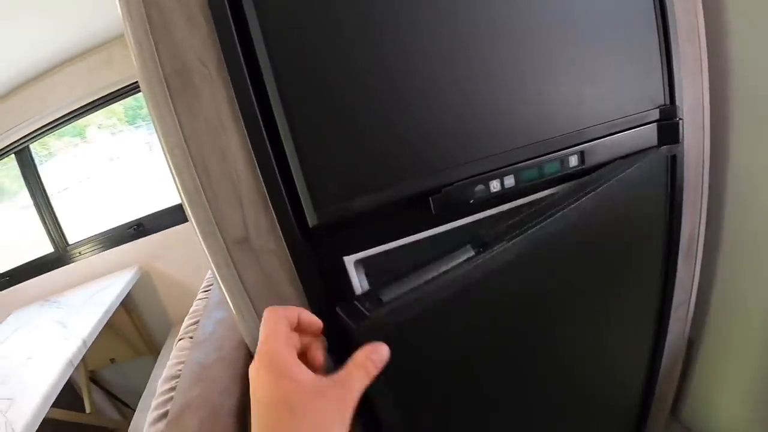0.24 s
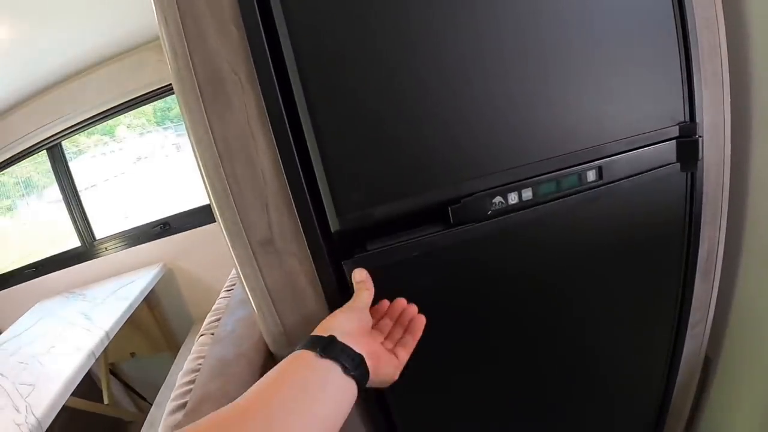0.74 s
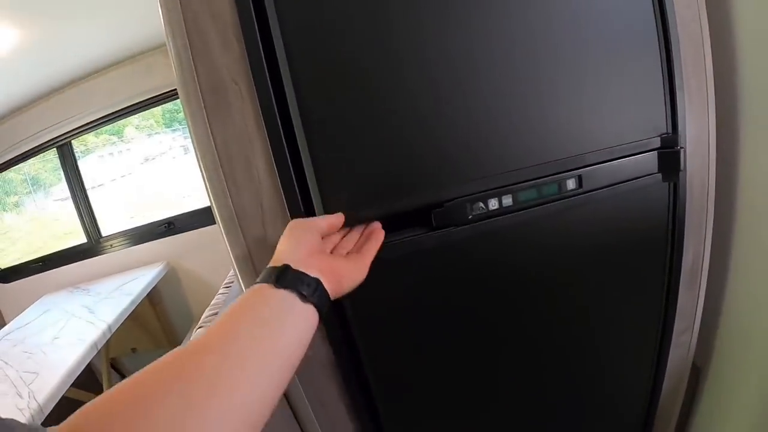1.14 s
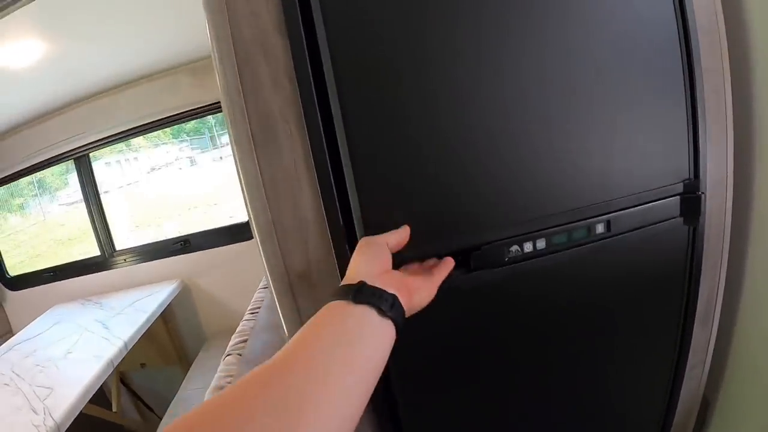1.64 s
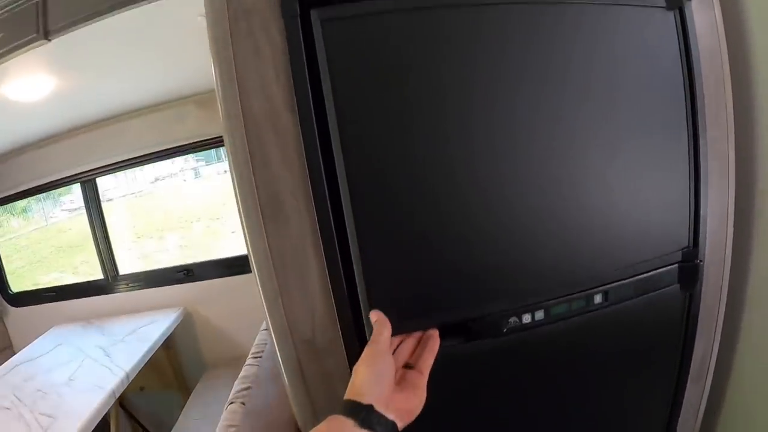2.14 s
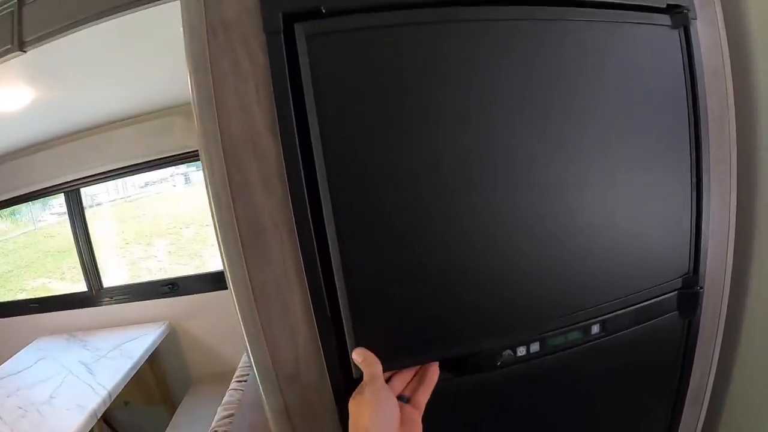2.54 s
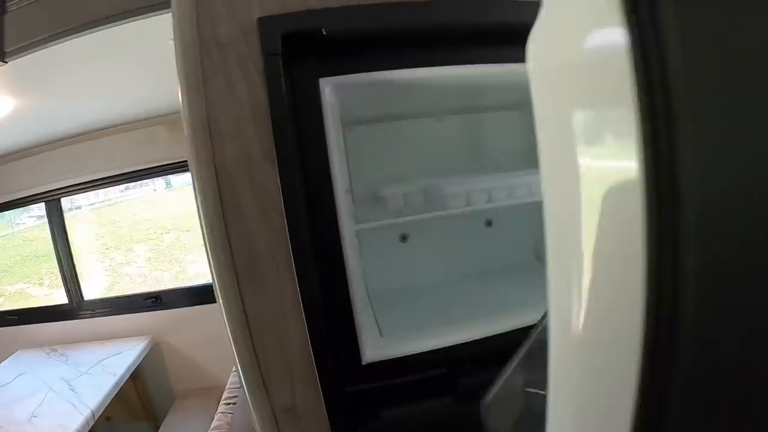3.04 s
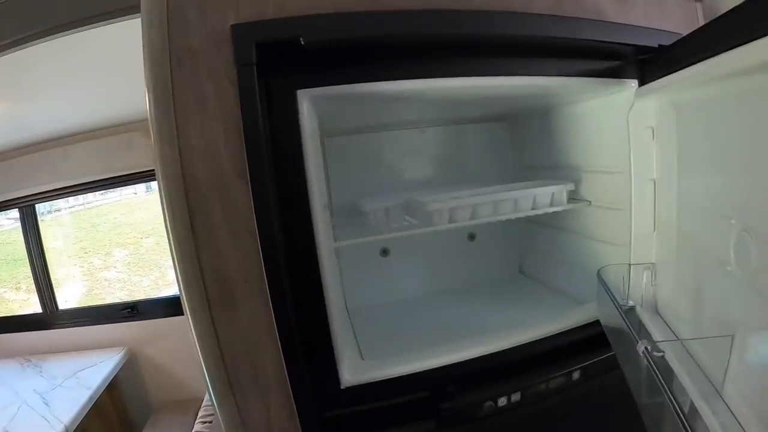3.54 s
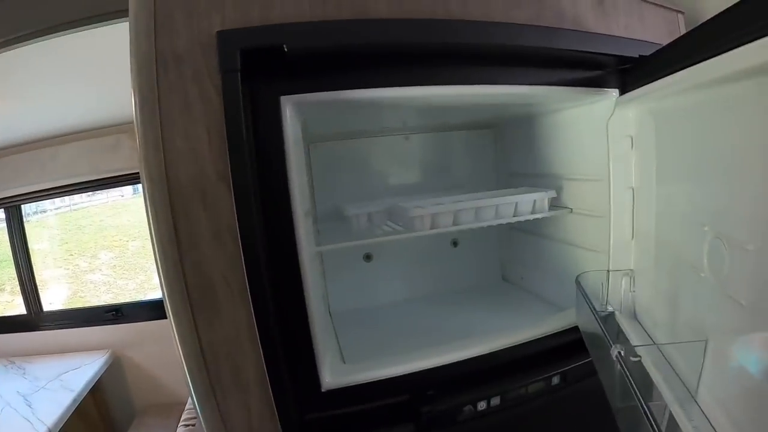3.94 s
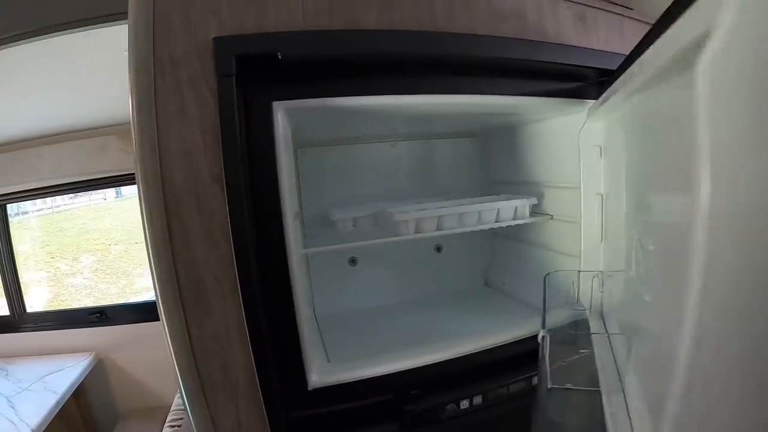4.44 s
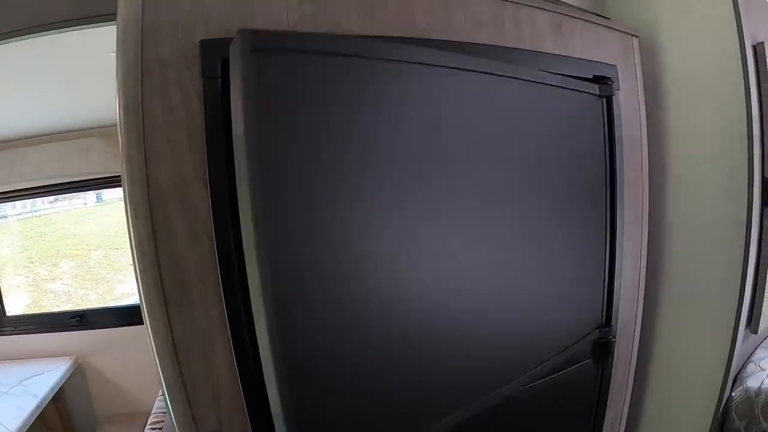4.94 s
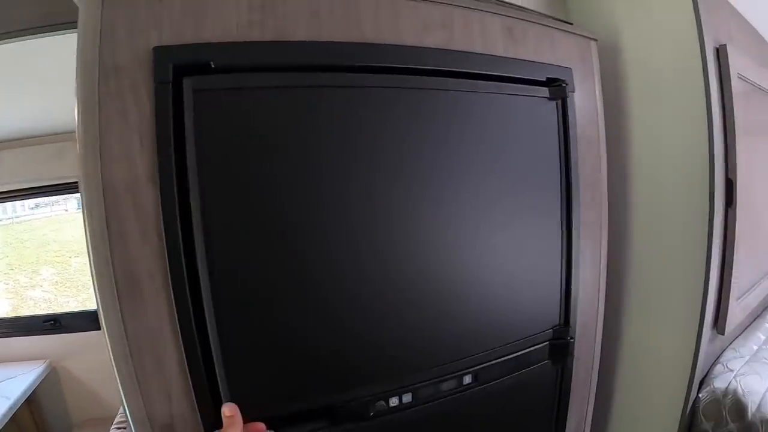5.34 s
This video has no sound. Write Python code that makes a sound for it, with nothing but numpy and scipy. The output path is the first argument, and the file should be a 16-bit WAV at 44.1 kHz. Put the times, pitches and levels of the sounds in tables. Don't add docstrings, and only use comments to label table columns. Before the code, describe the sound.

Close, dry stereo sound in a small padded camper, with low air rumble and a soft wavering fan hum throughout. Light finger rubs and plastic ticks start the scene; at about 0.45 s the contacts thicken, and at 0.65 s the fridge door lands with a deep hollow thump, followed at 0.73 s by a very bright latch crack. Small fumbling clicks run from 1.0 s to a hard plastic snap at 1.33 s. Quieter rubs and a cluster of rattles follow around 1.7-1.95 s. At 2.58 s the freezer door releases with a loud crack and boomy panel knock, with soft air thuds trailing to 2.9 s. Modest clacks mark the door stopping near 3.3 s. It is mostly quiet hum with faint taps until 4.6 s, plus a barely audible thin hinge squeak. Rubbing and dull bumps at 5.0-5.3 s lead to a sharp, bright closing snap at 5.38 s.

```python
import sys
import numpy as np
from scipy import signal
from scipy.fft import rfft, irfft, next_fast_len
from scipy.io import wavfile
from scipy.ndimage import uniform_filter1d

SR = 44100
rng = np.random.default_rng(int(sys.argv[2]) if len(sys.argv) > 2 else 0)


def inscribe(sig):
    pcm = np.round(np.clip(np.atleast_2d(sig).T, -1, 1) * 32767)
    wavfile.write(sys.argv[1], SR, pcm.astype(np.int16))


def field_ratio(decibels):
    return 10 ** (np.asarray(decibels, dtype=float) / 20)


N = 246127
TIME_S = np.arange(N) / SR
STRIKE_S = np.arange(8192) / SR
STRIKE_HZ = np.fft.rfftfreq(8192, 1 / SR)
OPPOSED = np.array([[1], [-1]])


def unit(x):
    return x / np.sqrt(np.mean(x ** 2) + 1e-30)


def decay(t, t60_s):
    return np.exp(-np.log(1000) * t / t60_s)


def ring(f, hz, width_hz):
    return 1j * f * width_hz / (hz ** 2 - f ** 2 + 1j * f * width_hz)


def band(x, hz, width_hz):
    size = next_fast_len(x.shape[-1])
    response = ring(np.fft.rfftfreq(size, 1 / SR), hz, width_hz)
    return irfft(rfft(x, size) * response, size)[..., :x.shape[-1]]


def walk(rate_hz):
    k = int(SR / rate_hz)
    held = np.repeat(rng.standard_normal(N // k + 1), k)
    return 1.3 * uniform_filter1d(uniform_filter1d(held, k), k)[:N]


def add(track, s, sound):
    i = int(s * SR)
    track[i:i + len(sound)] += sound[:N - i]


def cabin():
    # (frequency [Hz], density [dB per Hz])
    spectrum = [(25, -0.5), (50, -1.5), (100, -8), (140, -11.5), (190, -9.5), (280, -16.5), (400, -25.5),
                (700, -31), (850, -31), (1000, -25), (1400, -29.5), (2600, -47), (4500, -53.5), (7000, -60),
                (9500, -64.5), (11000, -70), (14000, -74)]
    # (time [s], sway [dB], handling [dB])
    motion = [(0, -3.5, 15.5), (.29, -3.5, 5.5), (.66, 13.5, 16), (.84, 2.5, -8), (1.06, -3, 7),
              (1.25, -5, 18), (1.4, 2, 0), (1.62, -2, 4), (1.85, 1, 19.5), (1.98, -1.5, 2), (2.35, -7, 4.5),
              (2.75, 10.5, 5.5), (3.0, 1, 3.5), (4.4, -10, 6), (5.07, -7, 10.5), (5.24, 4.5, 18),
              (5.4, -4, 11.5), (5.58, -8.5, -1)]
    # (rest level [dB], share of sway [1], share of handling [1])
    air = [(-39, 0.85, 0.0), (-55.5, 0.18, 0.73), (-66, 0.17, .95), (-78, 0.4, 1.34)]
    still_db = (-62, -66, -70, -77)
    motion_s, sway, handling = np.transpose(motion)
    sway_db = np.interp(TIME_S, motion_s, sway)
    hand_db = np.interp(TIME_S, motion_s, handling)

    size = next_fast_len(N)
    octaves = np.log2(np.fft.rfftfreq(size, 1 / SR) + 1)
    spectrum_hz, density_db = np.transpose(spectrum)
    colour = field_ratio(np.interp(octaves, np.log2(spectrum_hz), density_db, -40, -90))
    parts = [0, 0, 0, 0]
    for hz in 28 * 2 ** np.arange(0, 9.1, 1 / 3):
        third = np.cos(np.clip(1.5 * np.pi * (octaves - np.log2(hz)), -np.pi / 2, np.pi / 2))
        mid, side = irfft(rfft(rng.standard_normal((2, size))) * colour * third, size)[:, :N]
        apart = np.clip(max(.22 - hz / 1500, 0) + 0.054 + hz / 7000, 0, 1)
        k = int(hz > 140) + int(hz > 460) + int(hz > 1800)
        flicker = field_ratio(1.1 * walk(10))
        parts[k] = parts[k] + flicker * (mid + apart * side * OPPOSED)

    out = 0
    for part, floor_db, (rest_db, sway_share, hand_share) in zip(parts, still_db, air):
        stirred_db = rest_db + sway_share * sway_db + hand_share * hand_db
        out = out + unit(part) * np.hypot(field_ratio(stirred_db), field_ratio(floor_db))
    return out


def hum():
    # (start [s], end [s], frequency [Hz], level [dB])
    tones = [(0, 0.287, 95.5, -44.5), (0, 0.193, 361, -59.5), (0.402, 0.69, 95.7, -37.5),
             (0.483, 0.772, 368, -41.5), (0.976, 1.295, 386.4, -49), (1.093, 1.35, 243, -65),
             (2.102, 2.895, 99.35, -49.5), (2.205, 2.795, 248.3, -56), (2.95, 4.105, 244.6, -49.5),
             (3.319, 4.173, 89.5, -44), (4.27, 4.426, 104.6, -37.5), (4.448, 4.834, 102.2, -41.5),
             (5.024, 5.28, 103.4, -45), (5.025, 5.302, 253.3, -41.5), (5.378, 5.6, 104, -40),
             (2.71, 2.78, 1006, -50.5), (2.752, 2.787, 1200, -47), (2.734, 2.792, 417, -43),
             (4.1, 4.996, 255, -61.5), (0.792, 0.934, 200, -49.5)]
    out = 0
    for start, end, hz, db in tones:
        swell_s = max(0.04, .15 * (end - start))
        swell = np.clip(np.minimum(TIME_S - start, end - TIME_S) / swell_s + .5, 0, 1)
        phase = 2 * np.pi * np.cumsum(hz * (1 + .025 * walk(30))) / SR
        out = out + swell * field_ratio(db + 2.8 * walk(30)) * np.sin(phase)
    return out


def whine():
    # (frequency [Hz], level [dB])
    lines = [(9700, -100), (12100, -102)]
    return sum(field_ratio(db) * np.sin(2 * np.pi * hz * TIME_S) for hz, db in lines)


def latch(hz, ring_db, soft_db_per_khz, rise_s, t60_s):
    # (frequency [Hz], width [Hz], level over the broad body [dB])
    modes = [(1020, 96, -2), (1400, 290, -8.5), (1770, 170, -8), (2510, 170, -9.5), (2970, 218, -11.5),
             (3580, 240, -8.5), (4540, 1600, -5), (5900, 2700, -4), (6922, 260, -11)]
    t, f = STRIKE_S, STRIKE_HZ
    fade = decay(t, max(t60_s, .005)) * (1 - np.exp(-t / max(rise_s, 1e-4))) ** 2
    fade = fade * (1 + np.exp(-t / 0.00076))
    bounces = fade * rng.standard_normal(len(t)) * field_ratio(2.5 * rng.exponential(size=len(t)))
    clumps = uniform_filter1d(np.repeat(rng.standard_normal(64), 128), 64)
    bounces = bounces * field_ratio(3.0 / (1 + (rise_s / .02) ** 2) * clumps)

    body = 1 + field_ratio(ring_db) * ring(f, hz, .17 * hz)
    for mode_hz, width_hz, db in modes:
        scatter_db = 2.2 * rng.standard_normal()
        body = body + field_ratio(db + scatter_db) * ring(f, mode_hz, width_hz)
    softness = np.exp(-soft_db_per_khz * np.log(10) / 20 * f / 1000)
    radiation = (1j * f / (800 + 1j * f)) ** 2
    end_fade = np.cos(np.pi / 2 * (t / t[-1]) ** 4)
    sound = (irfft(rfft(bounces) * body * softness * radiation) * end_fade)[:-64]
    return sound / np.abs(sound).max()


def rubs():
    # (start [s], peak [dB], loudest ring [Hz], softness [dB per kHz], t60 [s])
    fridge = [(0.0, -32, 1200, 13.5, 0.015), (0.125, -46, 3970, 2.5, 0.34), (0.239, -47.5, 880, 21, 0.27),
              (.447, -27, 920, 5, 0.088), (0.474, -32.5, 1970, 6, 0.45), (0.516, -32, 1400, 3, 0.088),
              (0.59, -31.5, 1680, 19, 0.15), (.67, -27, 1260, 16, 0.36), (.714, -27, 1400, 18, 0.024),
              (1.13, -23.5, 1330, 5, 0.037), (1.308, -23.5, 970, 4.5, 0.037), (1.43, -57, 2130, 2.5, 0.2),
              (1.52, -45.5, 1400, 4.5, 0.3), (1.681, -52, 1320, 1.5, 0.18), (1.806, -31, 1090, 5.5, 0.038),
              (1.861, -25, 1230, 3.5, 0.059), (1.889, -22.5, 2500, 4.5, 0.05)]
    # (start [s], peak [dB], loudest ring [Hz], softness [dB per kHz], t60 [s])
    freezer = [(2.656, -45.5, 1010, 4, 0.28), (2.7, -40, 1120, 7, 0.16), (2.74, -39.5, 1210, 6, 0.065),
               (2.796, -34, 2200, 9.5, 0.12), (2.815, -35, 1290, 7, 0.069), (2.828, -39, 1800, 20, 0.06),
               (3.325, -37.5, 1680, 12.5, 0.092), (3.362, -34, 1720, 9, 0.037),
               (4.459, -45.5, 1104, 7, 0.05), (4.499, -56.5, 4740, 2, 0.41), (4.7, -51.5, 5420, 6, 0.25),
               (4.531, -42, 943, 18.5, 0.053), (4.633, -43, 1730, 9.5, 0.046),
               (5.018, -24, 2660, 6.5, 0.051), (5.141, -21, 1490, 6.5, 0.11), (5.159, -23, 1910, 15, 0.11),
               (5.205, -33.5, 2070, 15, 0.32), (5.285, -37.5, 1088, -12, .05)]
    out = np.zeros(N)
    for s, peak_db, hz, soft_db, t60_s in fridge + freezer:
        add(out, s, field_ratio(peak_db) * latch(hz, -1, soft_db, .17 * t60_s, t60_s))
    return out


def panel(hz, width_hz, push_s=0.00055):
    # (frequency [Hz], width [Hz], level [dB])
    modes = [(200, 160, -11.5), (253, 15, 2), (372.6, 32, 1), (450, 21, -1), (540.3, 9, 1.5),
             (736, 49, -25.5)]
    response = field_ratio(5.5) * ring(STRIKE_HZ, hz, max(width_hz, 5))
    response = response + sum(field_ratio(db) * ring(STRIKE_HZ, m, w) for m, w, db in modes)
    push = STRIKE_S * np.exp(-STRIKE_S / push_s)
    knock = irfft(rfft(push) * response)
    return knock / np.abs(knock).max()


def knocks():
    # (time [s], peak [dB], loudest ring [Hz])
    events = [(0.457, -29, 300), (0.58, -22.5, 525), (0.63, -24, 258), (0.647, -8, 230.4),
              (0.732, -16.5, 187.6), (0.745, -14.5, 223), (0.779, -21.5, 190), (0.999, -30.5, 221),
              (1.087, -36, 218), (1.105, -28, 310), (1.263, -33.5, 190), (1.3302, -14, 188.4),
              (1.35, -19.5, 171.5), (1.723, -29.5, 172), (1.774, -42, 215), (1.79, -34, 327),
              (1.816, -34, 423), (1.852, -38, 303), (1.875, -29, 450), (1.901, -33, 350), (.5, -31, 298),
              (0.541, -30.5, 420), (1.041, -36, 326), (1.159, -35, 309), (1.21, -36.5, 424),
              (1.942, -26, 240), (2.322, -40, 250), (2.581, -4.5, 253), (2.61, -23, 253),
              (2.868, -31.5, 170), (3.276, -29, 249), (3.364, -37, 253), (4.607, -36.5, 234),
              (5.099, -30.5, 164), (5.148, -31, 168), (5.185, -19, 260), (5.236, -18, 246),
              (5.29, -30, 358), (5.376, -17, 253)]
    out = np.zeros(N)
    for s, peak_db, hz in events:
        add(out, s, field_ratio(peak_db) * panel(hz, width_hz=25))
    return out


def ticks():
    # (time [s], peak [dB], loudest ring [Hz], softness [dB per kHz])
    events = [(0.4574, -24.5, 2430, 11), (0.5275, -24, 2020, 8.5), (.5316, -38.5, 1180, 2),
              (0.63, -34.5, 3000, 8), (0.6482, -9, 1980, 3), (0.7307, -3, 6100, 0.6),
              (0.7357, -14, 3100, 6), (.745, -19.5, 4000, 4), (1.077, -48, 5500, 9), (1.091, -45, 5800, -1),
              (1.1333, -29.5, 1430, 1.5), (1.229, -34, 3000, 2.5), (1.3278, -9.5, 1780, 5.5),
              (1.3373, -15, 4200, 1.5), (1.3463, -16.5, 1090, 6), (1.4475, -45.5, 2200, 3),
              (1.6029, -39.5, 1400, 8), (1.611, -43, 2030, 12), (1.691, -41.5, 950, 15.5),
              (1.8122, -30.5, 2500, 6), (1.848, -28, 2200, 2.5), (1.872, -28, 6730, 4),
              (1.8935, -27, 3775, 5), (1.9027, -27.5, 2310, 1), (1.9288, -28, 2000, 3),
              (2.4295, -48, 2180, 7), (2.6093, -26, 3600, 8), (2.6389, -22, 2340, 9.5),
              (2.695, -50, 8500, -3), (2.825, -36, 2300, 3), (2.835, -40, 2005, 6), (3.275, -38, 5030, 2),
              (3.361, -46, 5000, 4), (3.0, -53, 1150, 2), (4.899, -48.5, 3300, 3.5), (4.608, -41, 2010, 8),
              (4.6391, -41, 1704, 8.5), (5.0235, -41, 2530, 5.5), (5.153, -22.5, 1990, 5.5),
              (5.175, -27, 2000, 5), (5.214, -32, 2300, 7), (5.236, -41, 3000, 3), (5.297, -30, 2540, 14),
              (5.3762, -2, 2606, 0.5), (5.3877, -14, 1820, 7.5), (5.3985, -18.5, 3530, 4.5),
              (5.4305, -32, 3470, -1)]
    ring_db, rise_s, t60_s = 8.5, 0.00033, .014
    out = np.zeros(N)
    for s, peak_db, hz, soft_db in events:
        add(out, s, field_ratio(peak_db) * latch(hz, ring_db, soft_db, rise_s, t60_s))
    return out


def clicks():
    # (time [s], peak [dB], loudest ring [Hz], softness [dB per kHz], rattle t60 [s])
    fridge = [(0.571, -23.5, 1533, 2, 0.061), (0.6289, -20, 1500, 5.5, 0.035), (0.644, -8, 1410, 4, 0.066),
              (0.733, -9.5, 3330, 2, .09), (0.747, -18, 1180, 8, 0.076), (0.994, -36, 1342, 3.5, 0.18),
              (1.072, -33.5, 1253, 3, 0.11), (1.087, -30, 1050, 4.5, 0.074),
              (1.105, -30.5, 1010, 5.5, 0.15), (1.193, -29, 1450, 4.5, 0.053), (1.223, -33, 980, 4, 0.099),
              (1.242, -26, 804, 3.5, 0.026), (1.263, -29, 1020, 3.5, 0.077), (1.3272, -4.5, 1700, 3, 0.095),
              (1.325, -8, 4950, 0.5, 0.036), (1.725, -28, 1150, 2.5, 0.045), (1.771, -34, 3800, 3, 0.069),
              (1.776, -28, 1350, 21, 0.075), (1.839, -26, 2150, 6.5, 0.066), (1.931, -25.5, 880, 6, 0.086),
              (2.171, -48.5, 1098, 7.5, 0.052), (2.265, -57.5, 3020, 2, 0.037)]
    # (time [s], peak [dB], loudest ring [Hz], softness [dB per kHz], rattle t60 [s])
    freezer = [(2.32, -32, 1358, 3.5, 0.047), (2.365, -45, 965, 5, 0.2), (2.428, -51, 1080, 4.5, 0.033),
               (2.524, -46, 1310, 7, 0.036), (2.556, -27.5, 1020, 14, 0.12), (2.568, -40, 4300, 1.5, 0.046),
               (2.583, -15.5, 3670, 4.5, 0.14), (2.5792, -6.5, 4100, 0, 0.01),
               (2.5794, -4.5, 1056, 6.5, 0.019), (2.882, -52.5, 2990, 0.5, 0.026),
               (2.634, -26, 1020, 4, 0.037), (2.798, -26, 1316, 4, 0.047), (3.26, -25.5, 1750, 6, 0.081),
               (3.272, -23.5, 650, 7, 0.087), (3.297, -24.5, 984, 1.5, 0.052), (3.9, -40, 1012, 2.5, 0.038),
               (4.25, -38, 1020, 17.5, 0.051), (4.606, -38.5, 1760, 9, 0.16),
               (4.897, -43.5, 1700, 9, 0.026), (5.096, -28, 1097, 6, 0.12), (5.181, -17.5, 630, 2, 0.058),
               (5.263, -11, 1280, 5, 0.029), (5.3717, -9, 7900, 1.5, 0.02), (5.3755, -4, 1095, 3.5, 0.071)]
    clean_ring_db, loss_db_per_doubling, clean_t60_s = 8.5, 0.5, 0.055
    out = np.zeros(N)
    for s, peak_db, hz, soft_db, t60_s in fridge + freezer:
        doublings = np.log2(max(t60_s, .005) / clean_t60_s)
        ring_db = min(clean_ring_db - loss_db_per_doubling * doublings, 19)
        add(out, s, field_ratio(peak_db) * latch(hz, ring_db, soft_db, 0.00068, t60_s))
    return out


def thuds():
    # (time [s], peak [dB], frequency [Hz], t60 [s])
    events = [(0.573, -30, 67.5, 0.16), (0.641, -6.5, 55.6, 0.16), (0.718, -18.5, 120.5, 0.19),
              (0.791, -27, 64.6, 0.077), (1.263, -32.5, 47.6, 0.96), (1.32, -20, 167, 0.091),
              (1.928, -22, 61, 0.07), (2.579, -10, 55.7, 0.22), (2.639, -14.5, 54, 0.22),
              (2.716, -25, 82.5, 0.22), (2.756, -25.5, 101, 0.2), (2.805, -33, 61, 0.23),
              (2.875, -20.5, 92, 0.18), (3.261, -27.5, 51.1, 0.14), (5.102, -26, 85.5, 0.14),
              (5.187, -21, 57, 0.12), (5.24, -19, 53, 0.16), (5.291, -26, 37.2, 0.31)]
    out, t = np.zeros(N), np.arange(SR // 2) / SR
    for s, peak_db, hz, t60_s in events:
        phase = 2 * np.pi * hz * (t + 0.51 * 0.018 * (1 - np.exp(-t / 0.0013)))
        fade = decay(t, max(t60_s, .02)) * (1 - np.exp(-t / 0.003))
        add(out, s, field_ratio(peak_db) * np.sin(phase) * fade)
    return out


def taps():
    # (time [s], peak [dB], frequency [Hz], width [Hz])
    events = [(.5791, -21.2, 527, 42), (.6481, -21.2, 201, 51), (0.7381, -13.2, 398, 58),
              (0.7511, -22.2, 328, 121), (1.1331, -25.2, 1401, 161), (1.3271, -18.2, 263, 26),
              (1.3291, -16.2, 1240, 61), (1.3351, -20.2, 1001, 81), (1.9031, -34.2, 860, 91),
              (2.1721, -46.2, 1050, 151), (2.5061, -44.2, 1000, 71), (2.5561, -34.2, 523, 36),
              (2.5811, -15.2, 990, 71), (2.7001, -41.2, 378, 79), (2.7641, -32.2, 480, 68),
              (2.8031, -31.2, 1291, 53), (3.3311, -37.2, 1721, 101), (3.3701, -36.2, 585, 59),
              (3.3851, -42.2, 1100, 60), (4.2481, -37.2, 1003, 65), (4.5351, -47.2, 914, 117),
              (4.6111, -43.2, 1750, 121), (4.6451, -47.2, 636, 26), (5.0261, -24.7, 1001, 55),
              (5.2501, -19.2, 256, 39), (5.3781, -12.2, 1101, 111)]
    out = np.zeros(N)
    for s, peak_db, hz, width_hz in events:
        fade = np.exp(-np.pi * width_hz * STRIKE_S) * (1 - np.exp(-STRIKE_S / 0.0012))
        add(out, s, field_ratio(peak_db) * np.sin(2 * np.pi * hz * STRIKE_S) * fade)
    return out


def tugs():
    # (time [s], peak [dB], length [s], push 1 or pull -1 [sign])
    events = [
        (.655, -15, .009, -1),
        (1.3278, -11, .0028, -1),
        (1.9262, -17.5, .0065, 1),
        (1.9348, -15.5, .0052, -1),
        (1.9388, -22, .004, 1),
        (2.8695, -21, .007, -1),
    ]
    out = np.zeros(N)
    for s, peak_db, length_s, sign in events:
        add(out, s, sign * field_ratio(peak_db) * np.hanning(int(length_s * SR)))
    return out


def squeaks():
    # (time [s], frequency [Hz], level [dB])
    glides = [
        [(2.14, 10300, -79.5), (2.17, 9150, -79.5), (2.19, 9200, -86)],
        [(4.49, 11300, -91), (4.53, 12200, -90.5), (4.57, 12150, -85), (4.65, 12500, -92.5),
         (4.72, 13360, -96.5), (4.77, 13200, -89), (4.84, 10800, -93)],
        [(4.745, 10100, -69), (4.76, 10200, -69), (4.78, 9800, -76.5), (4.8, 9100, -87.5)],
    ]
    out = np.zeros(N)
    for rows in glides:
        s, hz, db = np.transpose(rows)
        level_db = np.interp(TIME_S, s, db, -200, -200) + 3.6 * walk(48)
        phase = 2 * np.pi * np.cumsum(np.interp(TIME_S, s, hz)) / SR
        out += field_ratio(level_db) * np.sin(phase)
    return out


def room(x, wet_db=-10.0):
    # (frequency [Hz], t60 [s])
    decays = [(125, 0.28), (500, 0.25), (1200, 0.11), (2800, 0.069), (6000, 0.19), (12000, 0.036)]
    alike = .05
    t = np.arange(SR // 2) / SR
    tail = 0
    for hz, t60_s in decays:
        mid, side = band(rng.standard_normal((2, len(t))), hz, 2.2 * hz) / np.sqrt(hz)
        apart = np.clip((1 - alike) * (hz / 2000) ** 0.89, 0, 1)
        tail = tail + np.sqrt(hz) * decay(t, t60_s) * (mid + apart * side * OPPOSED)
    tail = tail * (1 - np.exp(-t / 0.0055))
    tail = field_ratio(wet_db) * tail / np.sqrt(np.sum(tail ** 2) / 2)
    return signal.fftconvolve(x[None], tail, axes=1)[:, :N]


def scene():
    near = rubs() + knocks() + ticks() + clicks() + taps()
    slabs = thuds() + tugs()
    aside = 0.13 * signal.hilbert(band(near, 650, 500)).imag * OPPOSED
    wrapped = 0.18 * np.roll(slabs, 150) * OPPOSED
    return near + aside + room(near) + slabs + wrapped + hum() + cabin() + squeaks() + whine()


def low_pass(x):
    return signal.sosfilt(signal.butter(12, 16500, fs=SR, output="sos"), x)


def record(dry):
    # (frequency [Hz], left minus right [dB])
    balance = [(60, 0), (600, -0.5), (2500, 3), (5000, -.5), (9000, -1), (13000, -8.5)]
    turn_rad, turn_hz, top_hz = 1.6, 5000, 15300
    f = np.fft.rfftfreq(N, 1 / SR)
    hz, db = np.transpose(balance)
    left = field_ratio(np.interp(f, hz, db) / 2) * np.exp(-.5j * turn_rad * np.tanh(f / turn_hz))
    capsule = 1 / (1 + (f / 11000) ** 4)
    ports = irfft(rfft(dry) * capsule * np.array([left, 1 / left]), N)
    rounded = np.tanh(1.057 * ports) / 1.196
    mix = signal.sosfilt(signal.butter(8, top_hz, fs=SR, output="sos"), rounded)
    return low_pass(mix)


dry = scene()
out = record(dry)
inscribe(out)
```